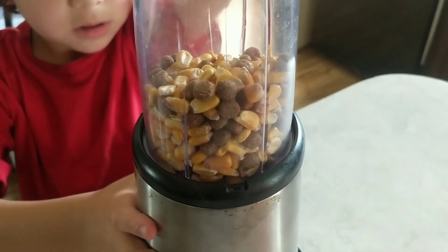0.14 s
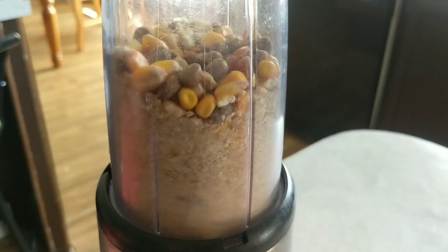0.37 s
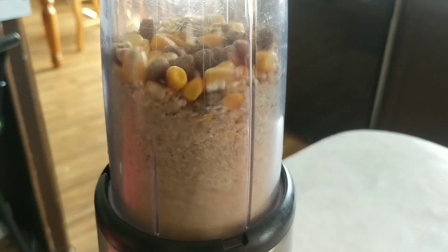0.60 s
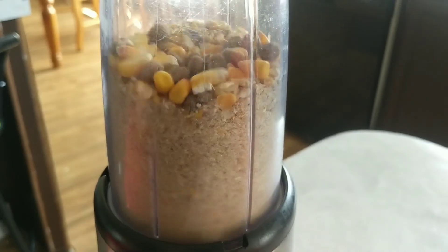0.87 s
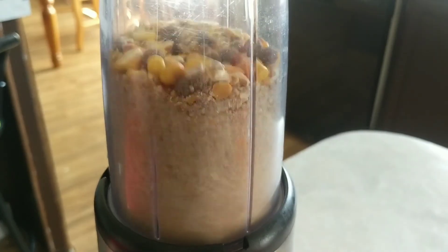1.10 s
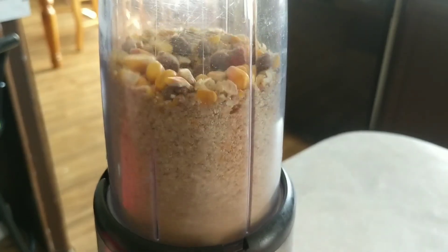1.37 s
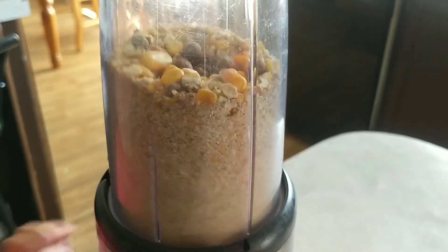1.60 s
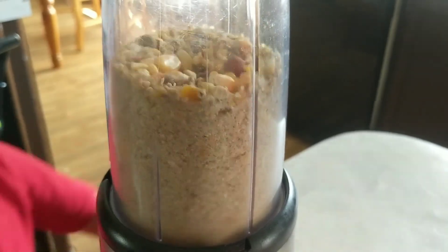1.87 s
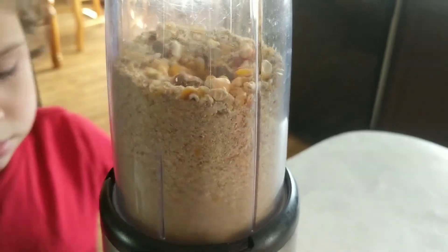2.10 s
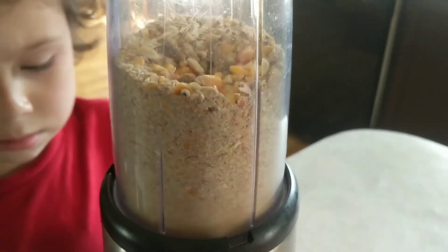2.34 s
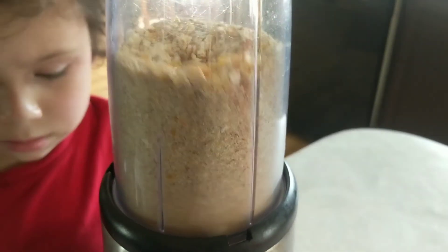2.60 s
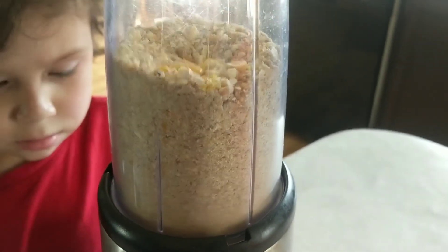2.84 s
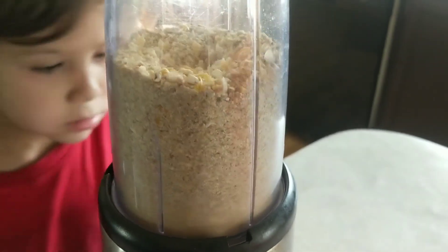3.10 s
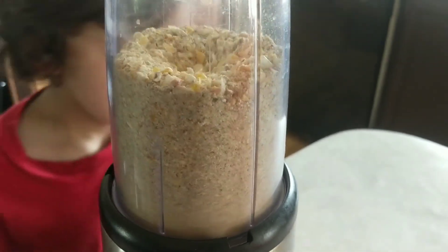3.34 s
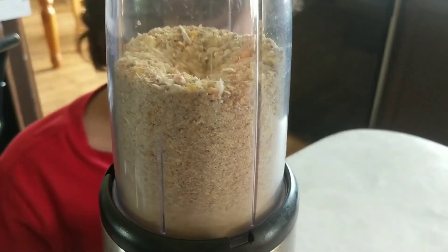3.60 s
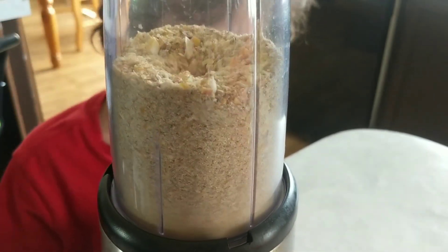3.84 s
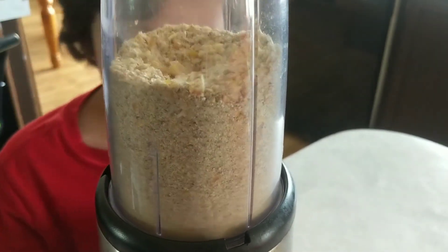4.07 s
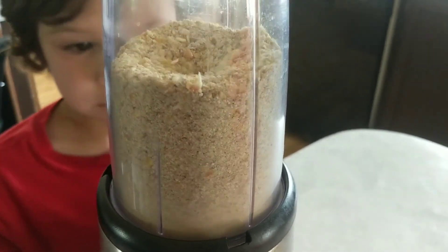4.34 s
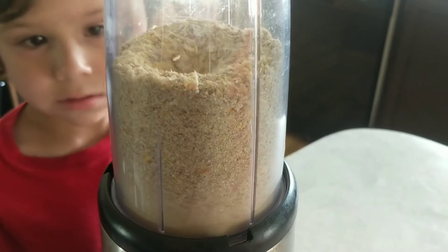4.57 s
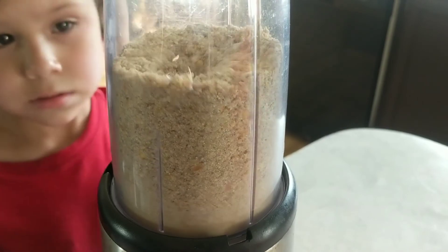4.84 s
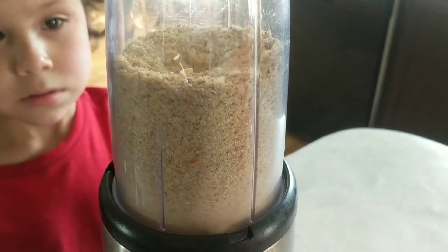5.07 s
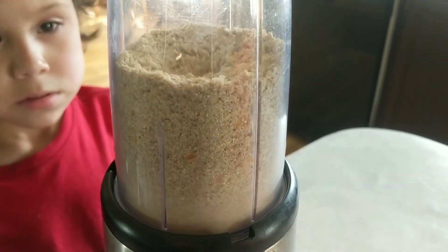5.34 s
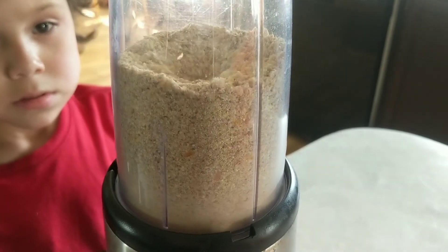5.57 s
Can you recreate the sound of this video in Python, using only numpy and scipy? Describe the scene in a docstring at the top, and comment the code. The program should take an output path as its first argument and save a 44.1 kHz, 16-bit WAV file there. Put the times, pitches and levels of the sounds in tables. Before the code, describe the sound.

A very quiet kitchen with low appliance hum lasts a third of a second, then drops to complete silence. A small blender starts instantly at full loudness, grinding dry corn and pellets: a dense, bright, rasping hiss full of sharp cracks, over a low noisy whir. The load surges and dips irregularly. The close, overdriven microphone thumps and distorts. The grind slowly loses treble and gains body, and it never stops.

```python
"""A quiet kitchen hums: sinusoids of wavering level and phase over filtered noise. A short silence follows.
Then a small blender of dry corn and pellets starts abruptly: a dense grind of meal (modulated, resonant
noise), kernels cracking against blades and cup (short noise bursts) and the housing's low whir (filtered
noise). Meanwhile the overdriven microphone pops in the bass (impulse responses) and saturates. The grind
dulls with time, by a slow fall of the treble and rise of the body."""
import sys
import numpy as np
from scipy import signal
from scipy.fft import rfft, irfft, next_fast_len
from scipy.io import wavfile
from scipy.ndimage import uniform_filter1d, map_coordinates

SR = 44100
rng = np.random.default_rng(int(sys.argv[2]) if len(sys.argv) > 2 else 0)


def put_to_file(sound):
    """Save the sound as 16-bit audio at rate SR, in the file named by the first command-line argument."""
    columns = np.atleast_2d(sound).T  # one column per channel
    safe = np.clip(columns, -1, 1)
    whole_steps = np.round(safe * 32767)
    wavfile.write(sys.argv[1], SR, whole_steps.astype(np.int16))


def rack_gain(trim_db):
    """Turn a fader trim in dB into the linear factor to multiply a signal by."""
    fader = np.asarray(trim_db, float)
    return 10 ** (fader / 20)


N = 251061  # samples

# kernels cracking at set times, weak to strong: t/s, nominal burst level/dB, brightness/dB
SET_CRACKS = [(.4424, -4, -2), (.4584, -10, -11), (.4943, -7, -3), (.545, -7.5, 8), (.5736, -11, -5),
              (.6264, -9, 8), (.6553, -9, -2), (.7363, -5, 2), (.782, -10, 11), (.8142, -7, 5),
              (.827, -11, 2), (.846, -10, 0), (.888, -14, -6), (.9246, -3, -4), (.9706, -4, 9),
              (1.063, -8, 8), (1.069, 2, 9), (1.093, -7, 10), (1.117, -15, 7), (1.1402, -3, 5),
              (1.1508, -11, -9), (1.2453, 2, 2), (1.2746, 0, -5), (1.384, -5, 9), (1.398, 0, -5),
              (1.425, 1, -5), (1.4574, -8, -10), (1.4942, -3, 6), (1.5095, 2, 7), (1.5448, 2, 15),
              (1.5836, -6, 16), (1.6708, -7, -9), (1.7916, -6.5, 14), (1.8952, -1, -6.5), (1.93, -4, 5),
              (1.9951, -1, 0), (2.0188, 0, 17), (2.2032, -2, -3), (2.2375, -6, 5), (2.289, -1, 3),
              (2.402, 7, 3), (2.4871, 3, 19), (2.6096, -6, 8), (2.828, -2, 19), (2.8937, -5, 9),
              (2.936, -4, 13), (3.0392, -1, 0), (3.1236, -6, -1), (3.3086, 7, -3), (3.3363, 11, 5),
              (3.4293, -2, 14), (3.5142, -6, 8), (3.558, -2, -3), (3.633, 3, 7), (3.6615, -2, 12),
              (3.682, -1, 4), (4.466, 3, -5), (4.544, -19, 15), (4.6513, 6, 14), (4.8093, -7, -3),
              (4.834, -4, 0), (5.0307, -5, 5), (5.0697, 0, 3), (5.3538, -3, 12), (5.376, -4, 7),
              (5.4483, -10, 6), (5.5329, -4, -10)]
# random cracks: mean level above the grind, its scatter, mean brightness, its scatter (all /dB)
RANDOM_DB, RANDOM_SCATTER_DB, RANDOM_BRIGHT_DB, BRIGHT_SCATTER_DB = 2, 1.5, 3.5, 7.5
# even grind between clumps, rising quickly at first, then wavering: t/s, grind level/dB
EVEN_FLOW = [(.43, -15), (1, -10), (2, -12.5), (3, -12), (3.8, -12), (4.6, -10.5), (5.69, -12)]
# clumps of kernels dropping into the blades: t/s, peak grind level/dB, length/s (full width at 1/2 power)
KERNEL_CLUMPS = [(0.457, -12, 0.026), (0.55, -13, 0.021), (0.73, -12, 0.033), (0.823, -18, 0.045),
                 (0.971, -13, 0.017), (1.066, -12.5, 0.078), (1.245, -9.5, 0.044), (1.407, -8.6, 0.061),
                 (1.504, -11, 0.027), (1.735, -10.5, 0.042), (1.893, -10.5, 0.084), (1.995, -11, 0.028),
                 (2.115, -9.5, 0.029), (2.194, -11.5, 0.068), (2.291, -10.5, 0.022), (2.357, -6.5, 0.057),
                 (2.474, -12, 0.026), (2.541, -8, 0.035), (2.744, -7.5, 0.025), (2.847, -10.5, 0.041),
                 (2.947, -9.8, 0.04), (3.21, -10, 0.028), (3.292, -8.5, 0.025), (3.428, -7.5, 0.012),
                 (3.502, -15.5, 0.013), (3.633, -10, 0.095), (4.06, -13, 0.022), (4.15, -9.5, 0.071),
                 (4.452, -7, 0.039), (4.637, -9.5, 0.058), (4.835, -19, 0.03), (5.078, -11, 0.036),
                 (5.304, -9, 0.16), (5.454, -9, 0.041), (5.543, -9.1, 0.039)]
# brief changes of the load, mostly dips: t/s, level change/dB, length/s
LOAD_CHANGES = [(0.485, -5.5, 0.0094), (0.522, 0, 0.027), (0.566, -2, 0.0099), (.60, -0.5, 0.025),
                (0.761, -3, .015), (0.87, -7.5, 0.023), (.952, -6.5, 0.011), (1.05, -2, 0.09),
                (1.195, -3, .03), (1.325, -5, 0.067), (1.523, -4, 0.011), (1.64, -1, .04),
                (1.796, -6.5, 0.037), (1.938, -5, 0.013), (1.975, -4, 0.021), (2.142, -3, 0.025),
                (2.264, -1, .03), (2.331, -9, 0.019), (2.424, -1.5, .03), (2.51, -8.5, 0.013),
                (2.72, -2.5, 0.022), (2.8, -2, 0.03), (2.876, -2, 0.027), (3.18, -1, 0.019),
                (3.26, -1.5, 0.033), (3.4, -1, 0.037), (3.486, -1, 0.033), (3.577, -5, 0.035),
                (4.036, 1.5, 0.024), (4.101, -5, 0.015), (4.373, -0.5, 0.075), (4.595, -2, .03),
                (4.777, -3, 0.032), (5.245, -3.5, 0.033), (5.328, -3, 0.038)]
# broad colour of the grind: f/Hz, relative level per Hz/dB
GRIND_COLOUR = [(200, -39), (900, -22.5), (1200, -12), (2600, -14), (3400, -14.5), (5500, -8.5), (7600, -9),
                (8400, -17), (10000, -12.5), (12000, -12), (14000, -17.5), (15500, -18)]
# resonances of cup, blades and microphone port: f/Hz, width/Hz, level over the broad colour/dB
CUP_RESONANCES = [(1279, 35, 7), (1480, 77, -2), (1678, 61, -9), (1866, 620, 5), (2470, 120, 5),
                  (4015, 180, 2.5), (6300, 665, 9), (7260, 540, 4), (10500, 300, 2)]
# slow drift of the grind's treble and body
TREBLE_DB_PER_S, BODY_DB_PER_S = -.4, 0.23
# whir of the motor housing: f/Hz, relative level per Hz/dB
WHIR_COLOUR = [(20, -26), (70, -22), (125, -9.5), (160, -2.5), (230, -8), (330, 3.5), (385, 0.5), (420, -1),
               (480, -3.5), (900, -2.5), (1300, -29)]
# whir level at t = 0 and a grind of -13 dB; dB per dB of grind; slow growth
WHIR_DB, WHIR_FOLLOWS, WHIR_GAINS_DB_PER_S = -35, 0.96, 0.51
# pops of the overdriven microphone at set times, faint to strong:
# t/s, nominal peak level/dB, swing-back relative level/dB
SET_POPS = [(0.782, -20, 2), (0.9052, -11, -20), (0.969, -36.5, 8), (1.2653, -16, -7), (1.322, -18.5, 2),
            (1.4543, -15, -5), (1.5115, -20, 2), (1.8355, -27, 5), (2.0183, -10, -16), (2.0569, -13, 0),
            (2.284, -14, -3), (2.533, -8.5, -25), (2.743, -25, 8), (2.828, -22, 0), (2.916, -18, 5),
            (2.935, -3, -7), (3.007, -13, -5), (3.34, -21, 2), (3.428, -27, 1), (3.653, -10.5, -12),
            (3.9846, -17, 4), (4.1387, -14, 0), (4.2874, -14, -3), (4.544, -21, 2), (4.7322, -14, -9),
            (4.9174, -2, -2.5), (5.4654, -11, -10), (5.6566, -24, 2)]
# kitchen air: f/Hz, relative level per Hz/dB
AIR_COLOUR = [(30, -46), (55, -14), (140, -9), (185, -5), (270, -9), (370, -12), (400, -19), (550, -16),
              (1000, -18), (1300, -23), (4000, -30), (7800, -36), (8500, -46), (15000, -50)]
AIR_DB = -47.5  # rms before the fade
# appliance hum in the kitchen: f/Hz, nominal rms level/dB
HUM_PARTIALS = [(60, -60), (120, -63), (182, -56), (241, -61), (360, -63), (701, -61), (720, -56),
                (738, -60)]
KITCHEN_ENDS, BLENDER_STARTS = 0.347, 0.4247  # s


def unit(x):
    """Normalisation: x scaled to rms 1."""
    return x / np.sqrt(np.mean(x ** 2) + 1e-20)


def along(points, hz):
    """Linear interpolation of (f/Hz, value) points on a logarithmic frequency axis."""
    f, v = np.transpose(points)
    return np.interp(np.log(hz + 1), np.log(f + 1), v)


def wobble(rate):
    """Band-limited fluctuation: a smooth random curve with rate knots a second."""
    knots = rng.standard_normal(int(N * rate / SR) + 4)
    return map_coordinates(knots, [np.arange(N) * rate / SR])


def coloured(x, gain_db):
    """Minimum-phase filtering by the folded cepstrum; gain_db gives the gain in dB at a frequency in Hz."""
    m = 2 * next_fast_len(N // 2 + 4096)
    cepstrum = irfft(gain_db(np.fft.rfftfreq(m, 1 / SR)) * np.log(10) / 20, m)
    cepstrum[1:m // 2] *= 2
    cepstrum[m // 2 + 1:] = 0
    response = np.exp(rfft(cepstrum))
    return irfft(rfft(x, m) * response, m)[:N]


def spikes(seconds, sizes):
    """Impulsive excitation: one impulse per event, superposed."""
    places = np.clip(np.round(seconds * SR).astype(int), 0, N - 1)
    return np.bincount(places, sizes, N)


def dying(x, rise, fall):
    """Exponential growth and decay: each impulse swells, then dies (time constants in s)."""
    t = np.arange(SR // 10) / SR
    shape = (1 - np.exp(-t / rise)) * np.exp(-t / fall)
    return np.abs(signal.fftconvolve(x, shape / shape.max())[:N])


def load():
    """Power addition: grind level in dB, the flow swollen by clumps, then shifted by brief changes."""
    t = np.arange(0, N / SR + .002, .002)
    bell = lambda s, length: np.exp(-np.log(16) * ((t - s) / length) ** 2)
    flow = rack_gain(np.interp(t, *np.transpose(EVEN_FLOW))) ** 2
    power = flow + sum(np.maximum(rack_gain(db) ** 2 - flow, 0) * bell(s, length)
                       for s, db, length in KERNEL_CLUMPS)
    level_db = 10 * np.log10(power) + sum(db * bell(s, length) for s, db, length in LOAD_CHANGES)
    return np.interp(np.arange(N) / SR, t, level_db)


def cup_db(hz):
    """Resonance: Lorentzian peaks, added in dB to the broad colour of the grind."""
    peaks = sum(db / (1 + ((hz - centre) / (width / 2)) ** 2) for centre, width, db in CUP_RESONANCES)
    return along(GRIND_COLOUR, hz) + peaks


def meal_bed(grind_db):
    """Dense noise excitation: meal hisses past the blades while small bits snap at random."""
    meal = rack_gain(-2.5 + 0.21 * wobble(30) + 1.8 * wobble(120)) * rng.standard_normal(N)
    draws = rng.random((2200, 2))
    powers = rack_gain(np.minimum(-6 * np.log(1 - draws[:, 1]), 22))  # a few bits are far louder
    bits = spikes(draws[:, 0] * N / SR, powers)
    snaps = unit(np.sqrt(dying(bits, rise=0.00021, fall=0.00081)) * rng.standard_normal(N))
    return rack_gain(grind_db) * unit(coloured(meal + rack_gain(-5.5) * snaps, cup_db))


def all_cracks(grind_db, count):
    """Random superposition: the set cracks and count random ones whose strength follows the load."""
    s = rng.random(count) * (N - 1) / SR
    scatter = rng.standard_normal((count, 2))
    db = grind_db[(s * SR).astype(int)] + RANDOM_DB + RANDOM_SCATTER_DB * scatter[:, 0]
    bright_db = RANDOM_BRIGHT_DB + BRIGHT_SCATTER_DB * scatter[:, 1]
    random_cracks = np.transpose([s, db, bright_db])
    return np.transpose(np.vstack([SET_CRACKS, random_cracks]))


def kernel_cracks(grind_db):
    """Brittle fracture: whole kernels crack in short noise bursts that ring through the cup."""
    s, db, bright_db = all_cracks(grind_db, count=260)
    scale = np.std(coloured(rng.standard_normal(N), cup_db))
    cracks = 0
    # a dull and a bright share of every crack; tilt in dB per octave about 6300 Hz
    for share, tilt_db in ((-1.82, 1.05), (0.79, 3.9)):
        powers = rack_gain(db + share * bright_db / 2) ** 2 / 2
        # each swell begins 0.9 ms before its crack's time
        power = dying(spikes(s - .0009, powers), rise=0.00086, fall=0.00082)
        # uneven, gritty break-up
        splinters = unit(rack_gain(2.4 * rng.standard_normal(N)) * rng.standard_normal(N))
        colour = lambda hz: cup_db(hz) + tilt_db * np.log2(np.clip(hz, 500, 16000) / 6300)
        cracks = cracks + coloured(np.sqrt(power) * splinters, colour) / scale
    return cracks


def churning(x, patchy_db, fine_db):
    """Time-varying filtering: the tumbling load changes how the cup rings, by random patches of gain."""
    hz, t, z = signal.stft(x, SR, nperseg=512)
    hz = hz[:, None]

    def field(bins, frames):
        """Moving average: white noise smoothed over frequency and time."""
        smooth = uniform_filter1d(rng.standard_normal(z.shape), bins, 0)
        return unit(uniform_filter1d(smooth, frames, 1))

    treble = np.clip((hz - 7500) / 1500, 0, 1) * TREBLE_DB_PER_S * (t - t.mean())
    body = np.clip((3500 - hz) / 800, 0, 1) * BODY_DB_PER_S * (t - t.mean())
    patches = patchy_db * field(bins=8, frames=8) + fine_db * field(bins=2, frames=20)
    # a narrow hollow wanders at random
    hollow_hz = 3200 + 200 * wobble(5)[np.clip((t * SR).astype(int), 0, N - 1)]
    hollow = -7 / (1 + ((hz - hollow_hz) / 130) ** 2)
    return signal.istft(z * rack_gain(patches + treble + body + hollow), SR, nperseg=512)[1][:N]


def grinding(grind_db):
    """Superposition: meal bed and cracks add, then pass the changing response of the cup."""
    bed = meal_bed(grind_db)
    return churning(bed + kernel_cracks(grind_db), patchy_db=1.0, fine_db=0.3)


def housing(whir_db):
    """Amplitude modulation: low noise whirs unevenly in the motor housing as the load jerks."""
    jerks = rack_gain(0.71 * wobble(25) + 2.5 * wobble(90))
    whir = coloured(jerks * rng.standard_normal(N), lambda hz: along(WHIR_COLOUR, hz))
    return rack_gain(whir_db) * unit(whir)


def pops():
    """Impulse response: the diaphragm jumps for about a millisecond, swings back slowly and settles."""
    s, db, swing_db = np.transpose(SET_POPS)
    draws = rng.random((90, 2))
    random_pops = spikes(draws[:, 0] * N / SR, rack_gain(-24 - 5.2 * draws[:, 1]))
    t = np.arange(SR // 15) / SR
    jump = np.exp(-np.abs(t - .001) / .00035)
    swing = np.exp(-t / 0.0043) * np.sin(2 * np.pi * 65 * t)
    jumps = signal.fftconvolve(spikes(s - .001, rack_gain(db)) + random_pops, jump)
    swings = signal.fftconvolve(spikes(s, rack_gain(db + swing_db)) + rack_gain(-6.0) * random_pops, swing)
    settling = signal.butter(2, 42, "high", fs=SR)
    return signal.lfilter(*settling, swings - jumps)[:N]


def kitchen():
    """Additive synthesis: wavering hum partials over quiet filtered noise, fading slightly before the end."""
    t = np.arange(N) / SR
    air = rack_gain(AIR_DB) * unit(coloured(rng.standard_normal(N), lambda hz: along(AIR_COLOUR, hz)))
    hum = sum(rack_gain(db + 1.5 * wobble(9.1)) * np.sqrt(2) * np.sin(2 * np.pi * hz * t + wobble(7.4))
              for hz, db in HUM_PARTIALS)
    fade = rack_gain(-6 * np.clip((t - .32) / 0.055, 0, 1))
    return (air + hum) * fade * (t < KITCHEN_ENDS)


def scene():
    """Succession and superposition: the kitchen, a silent gap, then all the blender's sounds at once."""
    t = np.arange(N) / SR
    grind_db = load()
    whir_db = WHIR_DB + WHIR_FOLLOWS * (grind_db + 13) + WHIR_GAINS_DB_PER_S * t
    blender = grinding(grind_db) + housing(whir_db) + pops()
    return (kitchen() + blender * (t >= BLENDER_STARTS))[None]


def low_pass(x):
    """Removes everything above the highest recorded frequency."""
    return signal.sosfilt(signal.butter(12, 15700, fs=SR, output="sos"), x)


def record(dry):
    """Band limiting and saturation: deep bass and top band fall away; peaks bend towards 0.82 of full scale."""
    def input_db(hz):
        """Low-pass shelf at 15750 Hz and second-order high-pass at 36 Hz."""
        top = -50 / (1 + np.exp((15750 - hz) / 40))
        bass = -10 * np.log10(1 + (36 / (hz + 1)) ** 4)
        return top + bass

    limited = coloured(dry[0], input_db)[None]
    clipped = limited / (1 + np.abs(limited / .82) ** 8) ** (1 / 8)
    return low_pass(clipped)


dry = scene()
out = record(dry)
put_to_file(out)
```